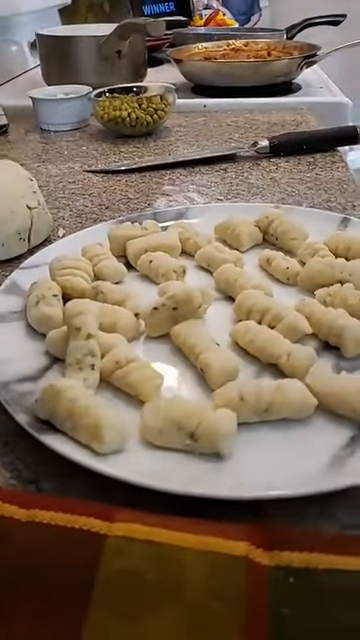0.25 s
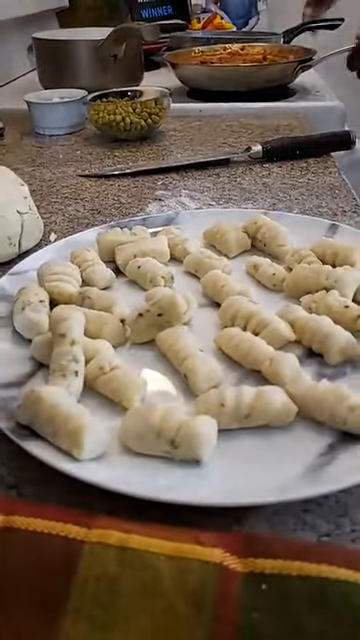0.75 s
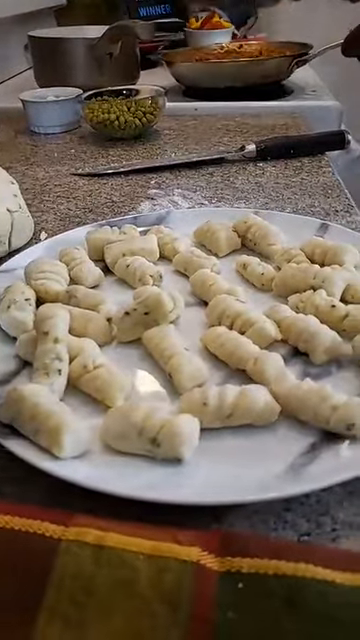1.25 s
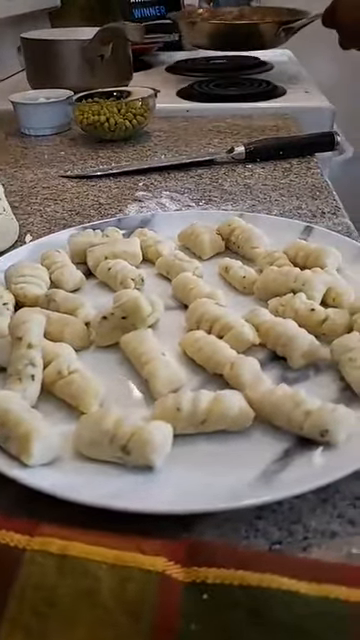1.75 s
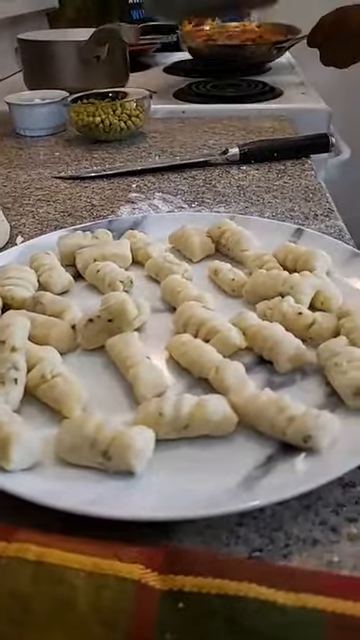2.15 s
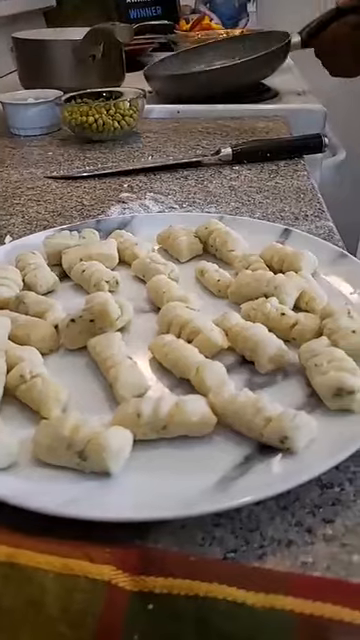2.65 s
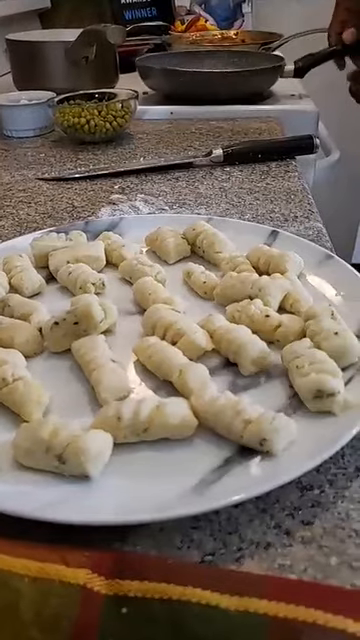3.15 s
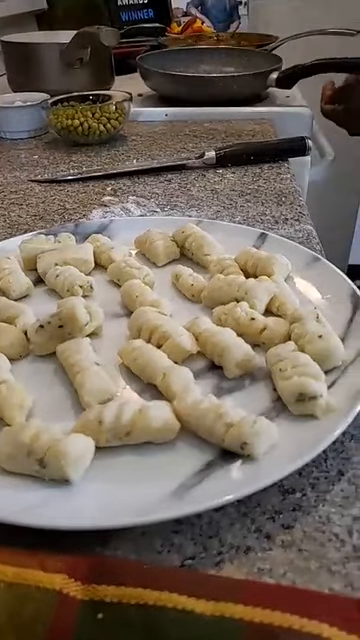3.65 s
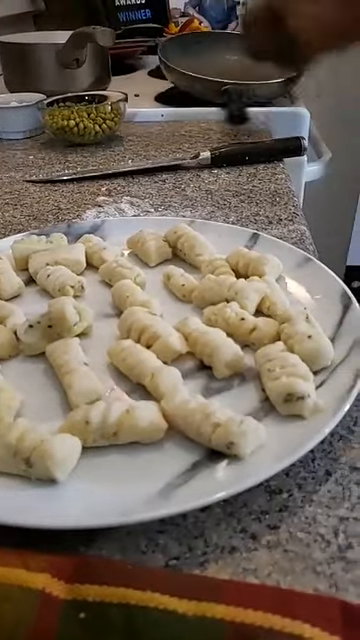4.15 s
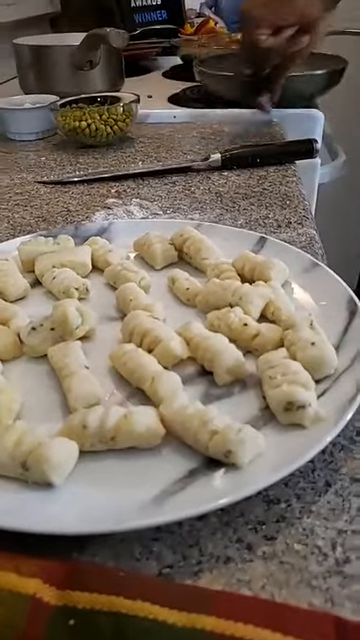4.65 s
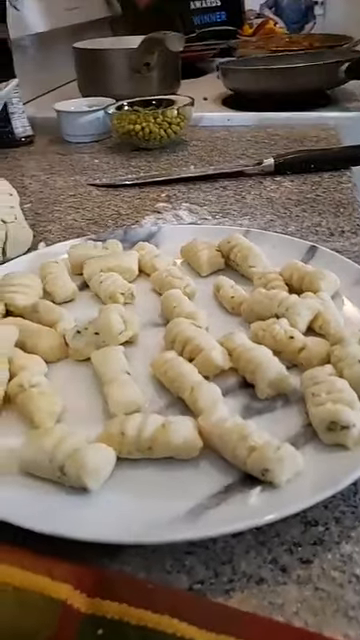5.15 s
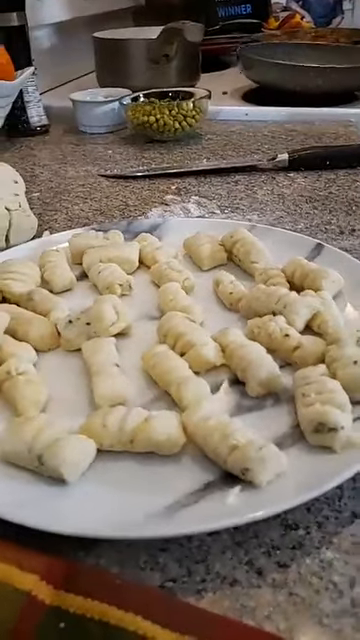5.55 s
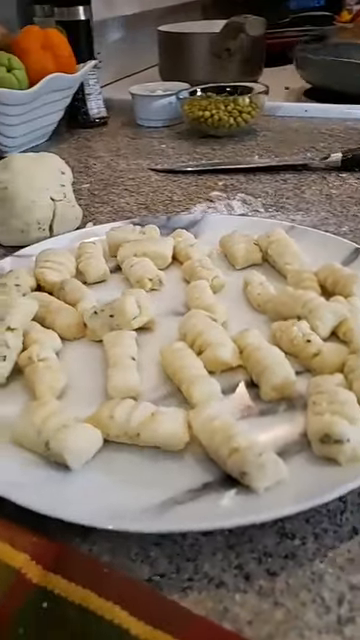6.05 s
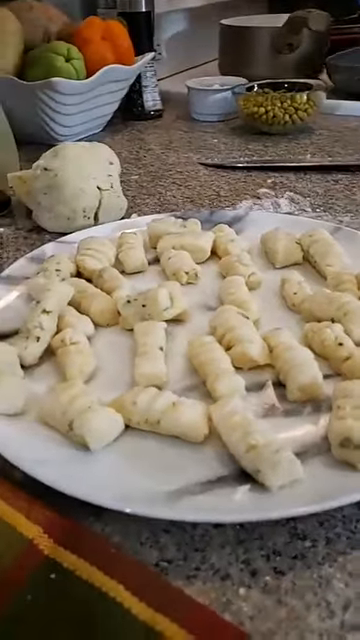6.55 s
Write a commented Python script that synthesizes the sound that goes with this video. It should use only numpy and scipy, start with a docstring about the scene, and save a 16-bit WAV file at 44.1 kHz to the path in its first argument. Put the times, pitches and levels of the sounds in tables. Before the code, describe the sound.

Two frying pans change places on an electric stove a short distance from the microphone, which picks up low fumbling at the start. A muffled scrape, then a pause, a bright hard hit and gritty sliding. Light taps lead to a burst of heavy clattering and a brief booming clank, followed by uneven rattles, nudges and squeaky rubbing, all with a short indoor reverberation over faint room noise.

```python
"""Frying pans on coil burners

Two frying pans change places on an electric stove, heard from the counter of a small kitchen.
Knocks are bursts of coloured noise with damped modes; one loud clank is the empty pan's base ringing.
Scrapes over the coils are filtered friction noise with small catches; the rim's squeals are noisy gliding tones.
A hand shifts on the microphone body at the start as rumble and rub, over steady coloured room noise.
"""
import sys
import numpy as np
from scipy import signal
from scipy.fft import rfft, irfft, next_fast_len
from scipy.io import wavfile
from scipy.ndimage import uniform_filter1d, map_coordinates

SR = 44100
rng = np.random.default_rng(int(sys.argv[2]) if len(sys.argv) > 2 else 0)


def store_pcm(level_fs):
    """Save levels as 16-bit WAV."""
    pcm = np.round(np.clip(level_fs, -1, 1) * 32767).astype(np.int16)
    wavfile.write(sys.argv[1], SR, np.atleast_2d(pcm).T)


N = 300321

# modes of the empty pan's wall and base: pitch_hz, level_db
PAN_MODES = [(373, -17), (629, -10), (690, -14), (843, -10), (985, -4.5), (1038, -4.5), (1114, -12),
             (1312, -8), (1425, -13), (1577, -4.5), (2235, -10.5), (2800, -16), (3090, -8.5), (3648, -13.5),
             (4050, -12), (4810, -17), (5085, -12)]
# what is struck where, in turn: full pan damped by its food; empty pan on the front coil, on the bare top,
# rim against the next coil, dropped on sheet steel, seated on the coil, nudged off it, over the back coil:
# start_s, boom_db, ring_db, hum_db, struck_part (a name)
PAN_PLACES = [(0, -13, -9, -47, "full pan"), (2.299, 2, -10.5, -15, "tray"), (3.06, 8, -8.5, -9.5, "pan"),
              (4.2, -4, -9, -1, "rim"), (4.31, 10.5, -7, -9, "pan"), (4.41, -1.5, 0.5, -4, "pan"),
              (5.25, -1.5, -5.5, -12, "pan"), (5.9, -4.5, 2, -8, "pan")]


def amp(db):
    """Decibels are logarithmic: 20 dB is a tenfold gain."""
    return 10 ** (np.asarray(db) / 20)


def unit(x):
    """Normalisation: scale a signal to rms 1."""
    return x / np.sqrt(np.mean(x ** 2) + 1e-20)


def along(points, hz):
    """Interpolation of (Hz, value) points on a logarithmic frequency axis."""
    f, v = np.transpose(points)
    return np.interp(np.log(hz + 1), np.log(f + 1), v)


def octaves_up(hz, corner_hz=1300):
    """Spectral tilt: octaves above the corner where the hardness of a contact begins to matter."""
    return np.log2(np.maximum(hz / corner_hz, 1))


def wobble(rate):
    """Slow random modulation: a smooth curve through random knots, rate of them a second."""
    knots = rng.standard_normal(int(N * rate / SR) + 4)
    return map_coordinates(knots, [np.arange(N) * rate / SR])


def noise(colour, n):
    """Spectral shaping: n samples of noise at rms 1, with colour(Hz) as spectrum in dB."""
    m = next_fast_len(n)
    spectrum = rfft(rng.standard_normal(m)) * amp(colour(np.fft.rfftfreq(m, 1 / SR)))
    return unit(irfft(spectrum, m)[:n])


def add(track, s, sound):
    """Superposition: mix a sound into the track at time s."""
    start = round(s * SR)
    track[start:start + len(sound)] += sound[:N - start]


def die_away(x):
    """Reverberant decay: the kitchen swallows each frequency at its own speed."""
    # reverberation of the kitchen: pitch_hz, t60_s
    kitchen_t60 = [(100, 1), (700, 0.8), (1840, 0.78), (4850, 0.69), (12800, 0.49)]
    hz, t, z = signal.stft(x, SR, nperseg=256)
    decay = amp(-60 * t / along(kitchen_t60, hz)[:, None])
    return signal.istft(z * decay, SR, nperseg=256)[1][:len(x)]


def strokes(rows, t60, wet=0.3):
    """Energy build-up and decay: gain of (s, length, dB) movements that swell, die down and leave a tail."""
    swell_db = 24.5  # linear part of the fall over half a length
    t, power = np.arange(N) / SR, 0
    for s, length, db in rows:
        away = abs(t - s) / (length / 2)
        power = power + amp(db - swell_db * away) ** 2 / (1 + away ** 6)
    keep = amp(-120 / (t60 * SR))  # acts on power: 60 dB down after t60
    tail = signal.lfilter([1 - keep], [1, -keep], power)
    return np.sqrt((1 - wet) * power + wet * tail)


def crowded_modes(depth_db, spacing_hz):
    """Modal density: thin steel's crowded upper modes as a fixed random ripple in dB over frequency."""
    knots = rng.standard_normal(2000)

    def ripple(hz):
        growth = np.clip(hz / 2000, 0, 1)
        return depth_db * growth * np.interp(hz / spacing_hz, np.arange(len(knots)), knots)
    return ripple


def ring(modes, t, scatter_db, tilt=0, blur_hz=0):
    """Modal synthesis: damped sines at random strengths; a pan that moves in the room makes each flutter."""
    hz, db, t60 = np.transpose(modes)[:, :, None]
    db = db + scatter_db * rng.standard_normal(hz.shape) + tilt * octaves_up(hz)
    knots = rng.standard_normal(size=(len(hz), 200))
    # random phase drift, starting from zero
    drift = np.array([np.interp(t * blur_hz, np.arange(len(row)), row - row[0]) for row in knots])
    modes_ringing = amp(db - 60 * t / t60) * np.sin(2 * np.pi * hz * t + drift)
    return np.sqrt(2) * np.sum(modes_ringing, axis=0)


def peaks(modes, hz, width_hz):
    """Resonance curves: summed height of a set of resonances at each frequency."""
    return sum(amp(db / 2) / (1 + ((hz - f) / width_hz) ** 2) for f, db, *_ in modes)


def singing(hz):
    """Resonant amplification: lift in dB that the empty pan's modes give to friction and rattle."""
    sharpness, resonance = 90, 1.1
    return 20 * np.log10(1 + resonance * peaks(PAN_MODES, hz, 1 + hz / sharpness))


def struck(part, width_hz=48, resonance=1.6):
    """Resonant filtering: lift in dB given by the struck part; each use for the empty pan is a new spot."""
    # the full pan, damped by its food: pitch_hz, level_db
    full_pan_modes = [(830, -5), (1270, -2), (1720, -6)]
    # front coil and its drip tray when a pan lands on them: pitch_hz, level_db
    tray_modes = [(235, -6), (405, -4), (770, -10), (1335, -4), (2340, 1), (3050, 3), (4060, 0), (5070, 0)]
    # the empty pan's rim, struck edge on: pitch_hz, level_db
    rim_modes = [(1070, 4), (1310, -4), (1775, -6), (2175, 12), (2700, -3), (3100, 3), (3795, 0)]
    if part == "pan":
        spot = crowded_modes(depth_db=3, spacing_hz=70)
        return lambda hz: singing(hz) + spot(hz)
    modes = {"full pan": full_pan_modes, "tray": tray_modes, "rim": rim_modes}[part]
    return lambda hz: 20 * np.log10(1 + resonance * peaks(modes, hz, width_hz))


def place(s):
    """Boundary conditions: boom, ring, hum and struck part that belong to the pan's place at time s."""
    start, *cols = zip(*PAN_PLACES)
    here = np.searchsorted(start[1:], s)
    return [np.array(c)[here] for c in cols]


def room_tone():
    """Stationary background noise: the quiet kitchen, its level wandering slightly."""
    # spectrum of the quiet kitchen: pitch_hz, density_db (per Hz, relative)
    quiet_colour = [(20, -25), (65, -0.5), (200, -9), (400, -15), (800, -10), (1840, -32), (3500, -40),
                    (6000, -36.5), (9000, -51), (13000, -38)]
    mean_db = -62
    return amp(mean_db + wobble(10)) * noise(lambda hz: along(quiet_colour, hz), N)


def handling(t60=0.7, lumps_db=2.0):
    """Structure-borne noise: fingers shifting on the housing make a low rumble and a soft, lumpy rub."""
    # finger shifts: strongest_s, length_s, rumble_db, rub_over_rumble_db
    finger_shifts = [(.04, .4, -48, 0), (.13, .18, -43, -6), (.51, 0.42, -42.5, -5.5)]
    # skin on the housing: pitch_hz, density_db (per Hz, relative)
    rub_colour = [(120, -6.5), (650, 1), (1500, -12), (6000, -20.5), (9000, -32), (13000, -22)]
    rumble_colour = [(10, -15), (30, 2), (110, -6.5), (200, -20), (500, -77)]
    housing = noise(lambda hz: along(rumble_colour, hz), N)
    skin = unit(amp(lumps_db * wobble(60)) * noise(lambda hz: along(rub_colour, hz), N))
    rumble = strokes([(s, length, db) for s, length, db, _ in finger_shifts], t60, wet=0.3)
    rub = strokes([(s, length, db + over) for s, length, db, over in finger_shifts], t60, wet=0.5)
    return rumble * housing + rub * skin


def squeals(hoarseness=0.055, t60=0.27):
    """Stick-slip oscillation: the rim sings briefly in hoarse gliding notes, blurred by a share of pitch."""
    # squeals of the rim: strongest_s, length_s, pitch_hz, rise_hz_per_s, level_db
    rim_squeals = [(6.1, .16, 1240, 500, -42), (6.143, .09, 1760, 5000, -45.5),
                   (6.49, .32, 2500, -1200, -51.5), (6.56, .22, 1400, 1500, -45)]
    out, t = np.zeros(N), np.arange(N) / SR
    for s, length, pitch, rise, db in rim_squeals:
        hz = pitch + rise * np.clip(t - s, -length / 2, length / 2)
        # slow noise that multiplies the tone widens it into a narrow band
        hoarse = noise(lambda f: -12 * (f / (hoarseness * pitch)) ** 2, N)
        tone = np.sin(2 * np.pi * np.cumsum(hz) / SR)
        out += strokes([(s, length, db)], t60) * hoarse * tone
    return out


def catches(rate=90, spread_db=3, t60=0.037, share=0.3):
    """Intermittent friction: rms-1 envelope of a steady rub plus small catches of uneven size."""
    sizes = (rng.random(N) < rate / SR) * amp(spread_db * rng.standard_normal(N))
    decay = amp(-120 * np.arange(SR // 4) / SR / t60)  # of power
    power = abs(signal.fftconvolve(sizes ** 2, decay)[:N])
    return np.sqrt(1 - share + share * power / power.mean())


def friction(spectrum, steel, pan, count=3):
    """Friction excitation of resonances, which change as the point of contact wanders."""
    out = np.zeros(N)
    for _ in range(count):
        spot = crowded_modes(depth_db=3.5, spacing_hz=110)
        share = amp(9 * wobble(9))
        out += share * noise(lambda hz: along(spectrum, hz) + steel(hz) + pan(hz) + spot(hz), N)
    # even out the short-time level
    return out / np.sqrt(abs(uniform_filter1d(out ** 2, size=2000)) + 1e-12)


def bowed_base(drag, width_hz=20):
    """Sustained excitation: dragged over the coil, the base keeps humming roughly on its main notes."""
    main_notes = PAN_MODES[4:6]
    hum = noise(lambda hz: 20 * np.log10(peaks(main_notes, hz, width_hz)) - 12 * octaves_up(hz), N)
    _, _, hum_db, _ = place(np.arange(N) / SR)
    return amp(hum_db) * drag * hum


def slides(steel, grind_db=-2.0, hiss_db=-2.5, push_db=0.5):
    """Sliding friction: pans catch and slip over the coils, coloured by each pan and the back coil."""
    # shoves, levels before the trims in the arguments: fastest_s, length_s, grind_db, hiss_over_grind_db
    shoves = [(0.905, 0.19, -29.5, -3.5), (2.323, 0.46, -40.5, -11), (2.483, 0.26, -35, -8),
              (2.94, .26, -48.5, -14), (3.167, 0.2, -36, -7.5), (3.36, 0.4, -45.5, -14.5),
              (3.846, 0.61, -48.5, -4.5), (4.065, 0.51, -45, -15), (4.865, .5, -36.5, -7),
              (5.134, 0.25, -39.5, -7), (5.512, .12, -37.5, -4.5), (6.2, 0.36, -40, -9),
              (6.545, 0.38, -42.5, -5.5)]
    # low grinding over the coils: pitch_hz, density_db (per Hz, relative)
    grind_colour = [(40, -12), (70, 0), (220, 1), (480, -5), (800, -2), (1100, -8), (1350, -4.5),
                    (1900, -12), (2500, -17.5), (3300, -42)]
    # high hiss over the coils: pitch_hz, density_db (per Hz, relative)
    hiss_colour = [(1500, -32), (2500, 7.5), (5200, 3), (7200, -2), (9600, -12.5), (11500, 0.5),
                   (14500, -14.5)]
    # a pan pushed over the back coil: pitch_hz, density_db (per Hz, relative)
    coil_colour = [(40, -19), (80, -2), (230, 1), (330, -5.5), (800, -5), (1030, -3), (1450, 1),
                   (1900, -10), (2900, -10), (3600, -24.5), (5000, -22), (9000, -33.5), (14500, -36)]
    grind_t60_s, hiss_t60_s = 0.62, 0.48  # how long each hangs in the kitchen
    grind = strokes([(s, length, db) for s, length, db, _ in shoves], grind_t60_s, wet=.5)
    hiss = strokes([(s, length, db + over) for s, length, db, over in shoves], hiss_t60_s, wet=0.31)
    t = np.arange(N) / SR
    empty_from_s, back_coil_from_s = PAN_PLACES[1][0], PAN_PLACES[-1][0]

    def in_pan(spectrum):
        full = friction(spectrum, steel, struck("full pan"))
        empty = friction(spectrum, steel, singing)
        return np.where(t < empty_from_s, full, empty)

    pushed = amp(push_db) * friction(coil_colour, steel, singing)
    low = np.where(t > back_coil_from_s, pushed, amp(grind_db) * in_pan(grind_colour))
    high = amp(hiss_db) * in_pan(hiss_colour)
    return catches() * (grind * low + hiss * high) + bowed_base(grind)


def pan_modes():
    """Frequency-dependent damping: the pan's modes with ring times that shorten with pitch."""
    t60_s, slope = .7, -.25  # ring time at 1 kHz and its power law
    return [(hz, db, t60_s * (hz / 1000) ** slope) for hz, db in PAN_MODES]


def partials(t, tilt, t60=0.17, fall_db=-3, count=26):
    """Position-dependent mode excitation: a new random handful of upper modes for each contact point."""
    hz = rng.uniform(1100, 7800, count)
    lives = t60 * rng.uniform(.4, 1.3, count)
    modes = np.transpose([hz, fall_db * octaves_up(hz), lives])
    return ring(modes, t, scatter_db=5.0, tilt=tilt, blur_hz=61.6)


def rim_note(t, hz, db, t60=0.27):
    """Selective mode excitation: the one rough note that a blow near the rim brings out."""
    return ring([(hz, db, t60)], t, scatter_db=1, blur_hz=130)


def knocks(steel, stove_t60=0.25, room_db=-12, room_rise=0.025, ring_db=-7, partials_db=-13, hardness=0.95):
    """Impact excitation: each knock rattles the stove top, rings the pan and fills the kitchen."""
    # knocks, skids and taps; a blow near the rim has the last two columns too:
    # start_s, level_db, brightness_db_per_octave, contact_s, note_hz, note_over_knock_db
    blows = [(0.008, -47.5, 3.5, 0.025, 630, 2), (0.833, -42, 3, 0.02), (.876, -31.5, 0.5, 0.04),
             (1.240, -52.5, -7, 0.016, 2880, -13), (2.122, -26.2, 1.5, .018, 820, -9),
             (2.406, -38, 0.7, 0.019), (2.583, -16.8, 1, 0.0025), (3.023, -53.5, 0, 0.031),
             (3.113, -44.5, -1, .006), (3.150, -37.5, -2, 0.024), (3.226, -37, 1, 0.0005, 630, -3),
             (3.442, -50.5, -1, 0.01), (3.629, -50.5, -6, 0.003, 615, -1), (3.877, -40, -2, .003, 1400, 0),
             (3.901, -38, 1.5, 0.006), (4.286, -22.3, -7, 0.002), (4.330, -29, -4, 0.013),
             (4.361, -19, -2.5, .001, 1040, -3), (4.367, -26, 4.5, 0.0075), (4.443, -26, -2, 0.015),
             (4.461, -28, -1, .03), (4.648, -32, 1.5, 0.0057, 3100, -7), (4.72, -28, 1, 0.0096),
             (4.83, -36.5, -1, 0.0044), (4.885, -36, -2, .005), (5.035, -39.5, -1, .003, 1740, -3),
             (5.311, -34.5, -3, 0.0025), (5.341, -33.5, 1.5, 0.0041), (5.413, -41, -4, .004),
             (5.440, -30.5, 1.5, 0.005), (5.476, -28.3, 0.5, 0.001, 1440, -4),
             (5.618, -47, 2, .004, 4800, -5), (5.805, -62, 1, 0.0057), (5.972, -42, 0, 0.026, 1036, -1),
             (6.07, -50.5, -0.5, .009, 2870, -4)]
    # stove top and coils when knocked: pitch_hz, density_db (per Hz, relative)
    stove_colour = [(30, -24), (70, 0.5), (200, -3.5), (480, -0.5), (750, 3.5), (1100, 1), (1350, 2),
                    (1900, -4), (3000, -7.3), (5000, -8), (7200, -11.5), (9000, -21), (11800, -13.5),
                    (14500, -24)]
    mute_db_per_s = 241  # the longer a contact lasts, the less the pan rings after it
    out, t = np.zeros(N), np.arange(SR) / SR
    short = SR // 2
    for s, db, bright, contact, *note in blows:
        boom_db, free_db, _, part = place(s)
        pan_db = free_db - mute_db_per_s * contact
        spot = struck(part)

        def colour(hz):
            boom = boom_db / (1 + (hz / 170) ** 2)
            return along(stove_colour, hz) + steel(hz) + spot(hz) + bright * octaves_up(hz) + boom

        # a pan that skids as it lands builds up slowly and keeps driving the steel
        onset = 1 - np.exp(-3 * t / max(contact, 1e-4))
        rattle = noise(colour, SR) * amp(-60 * np.maximum(t - contact, 0) / stove_t60)
        room = die_away(noise(colour, SR)) * (1 - np.exp(-t / room_rise))
        ringing = ring(pan_modes(), t, scatter_db=3, tilt=hardness * bright, blur_hz=35)
        metal = amp(pan_db + ring_db) * ringing
        if note:
            metal += rim_note(t, *note)
        add(out, s, amp(db) * onset * (rattle + amp(room_db) * room + metal))
        add(out, s, amp(db + pan_db + partials_db) * onset[:short] * partials(t[:short], bright))
    return out


def clank(s=4.459, damped_db=-18, room_db=-13.5, width_hz=30):
    """Contact damping: the base rings freely for a moment, then settles on the coil, which damps it."""
    # the pan's base struck flat: pitch_hz, level_db, t60_s
    base_modes = [(376, -19, .7), (690, -14, .15), (760, -14, .15), (850, -11, .25), (978, 0, .3),
                  (2240, -20, .3), (2790, -24, .3)]
    level_db = -12.5
    rise, free, settle, room_rise = .003, .035, .007, .02  # seconds
    rock_s, rock_db = .08, -15
    out, t = np.zeros(N), np.arange(SR) / SR
    seated = 1 - np.exp(-np.maximum(t - free, 0) / settle)
    base = ring(base_modes, t, scatter_db=1, blur_hz=10) * (1 - np.exp(-t / rise))
    base = base * amp(damped_db * seated)
    # the kitchen returns the short burst as a rough cluster around the same notes
    cluster = noise(lambda hz: 20 * np.log10(peaks(base_modes, hz, width_hz)) - 7 * octaves_up(hz), SR)
    echo = die_away(cluster) * (1 - np.exp(-t / room_rise))
    add(out, s, amp(level_db) * (base + amp(room_db) * echo))
    add(out, s + rock_s, amp(level_db + rock_db) * base)  # the pan rocks once more
    return out


def scene():
    """Superposition of the pans over the quiet of the kitchen, all sharing one ripple of the steel."""
    steel = crowded_modes(depth_db=2, spacing_hz=30)
    background = room_tone() + handling()
    pans = squeals() + slides(steel) + knocks(steel) + clank()
    return (background + pans)[None]


def record(dry):
    """Band limiting: nothing is kept at or above the top frequency."""
    top_hz = 14600
    m = next_fast_len(N + SR // 2)
    passed = np.fft.rfftfreq(m, 1 / SR) < top_hz
    return irfft(rfft(dry, m) * passed, m)[:, :N]


dry = scene()
out = record(dry)
store_pcm(out)
```